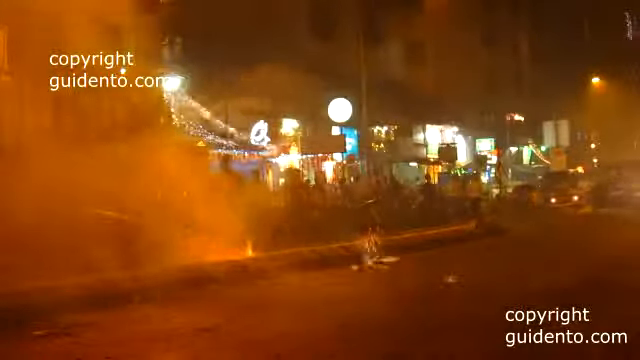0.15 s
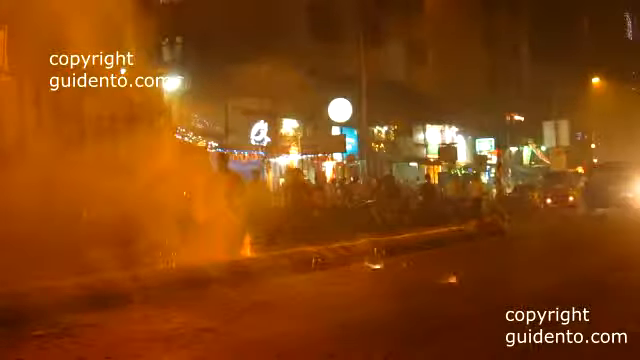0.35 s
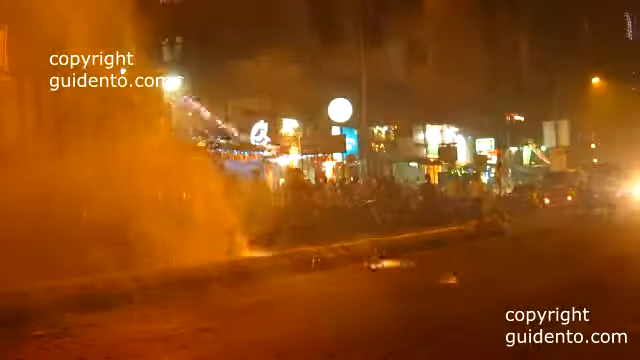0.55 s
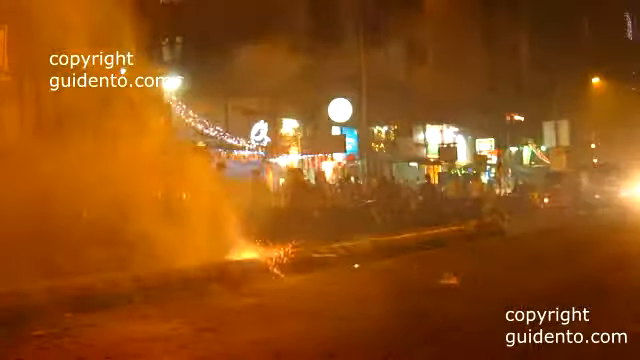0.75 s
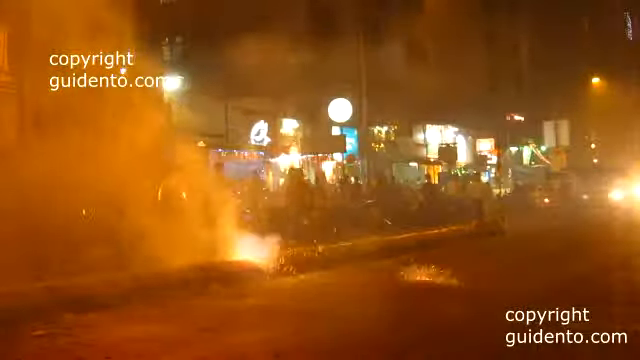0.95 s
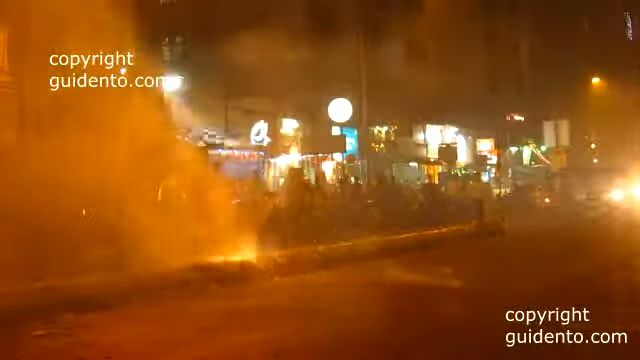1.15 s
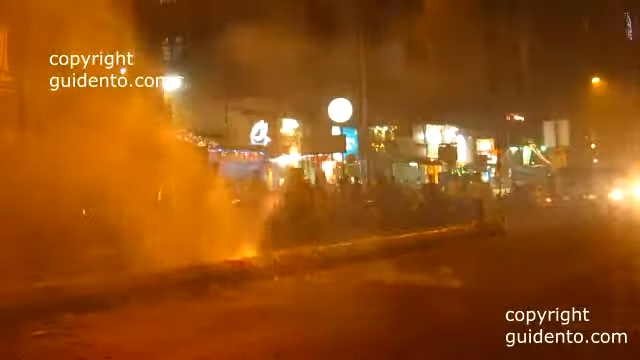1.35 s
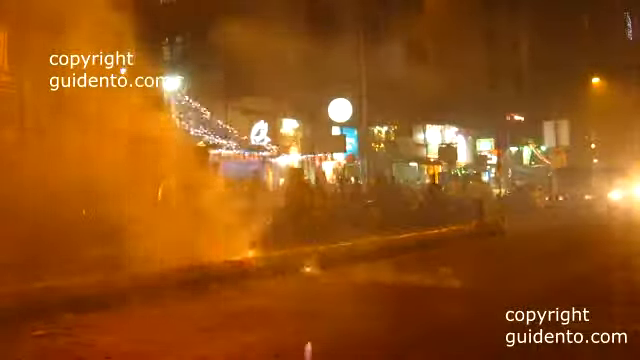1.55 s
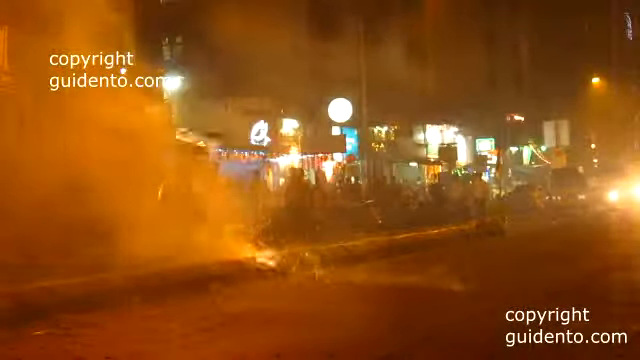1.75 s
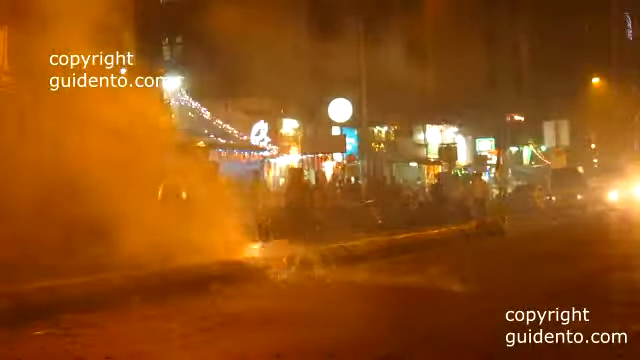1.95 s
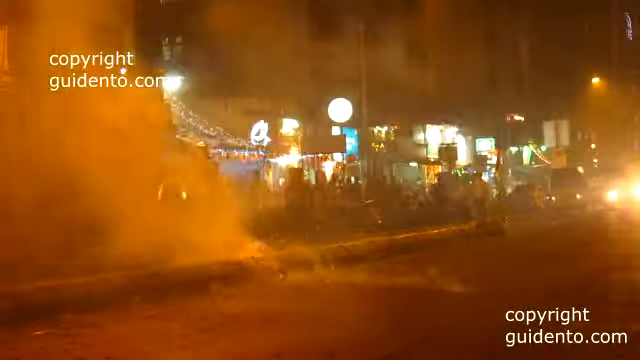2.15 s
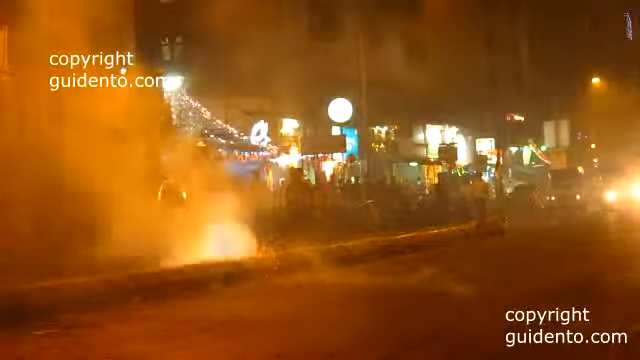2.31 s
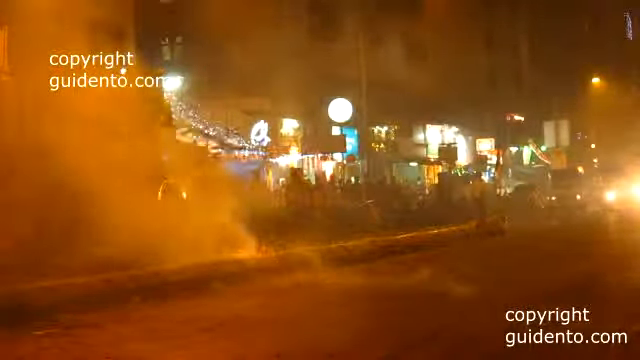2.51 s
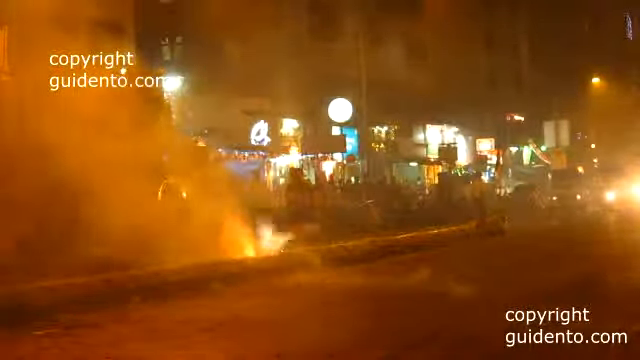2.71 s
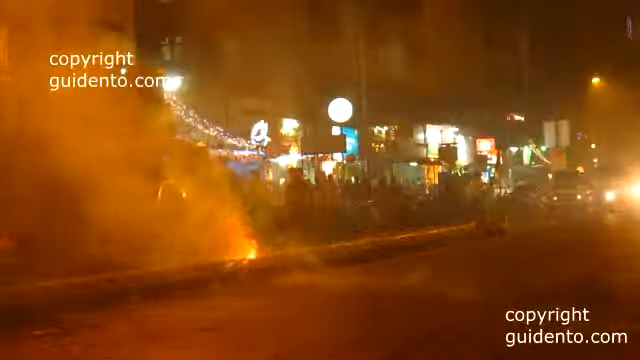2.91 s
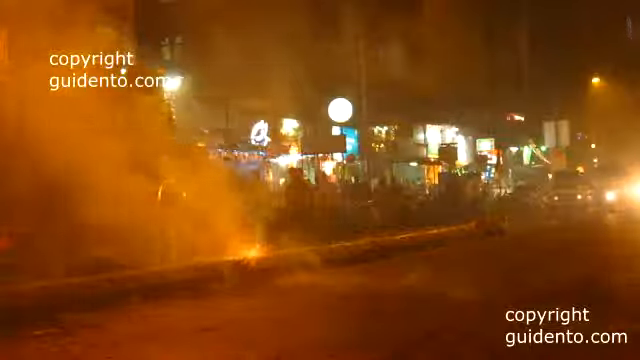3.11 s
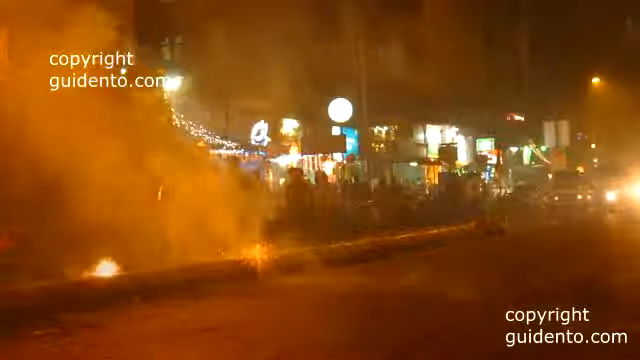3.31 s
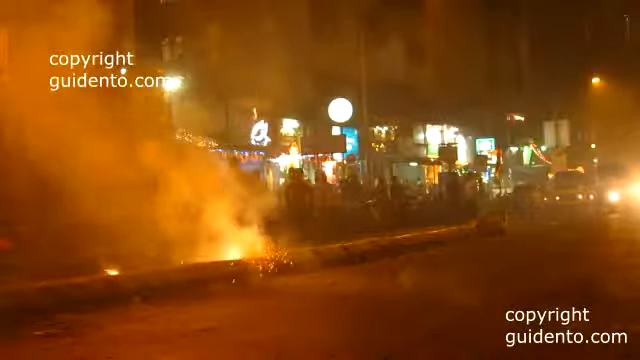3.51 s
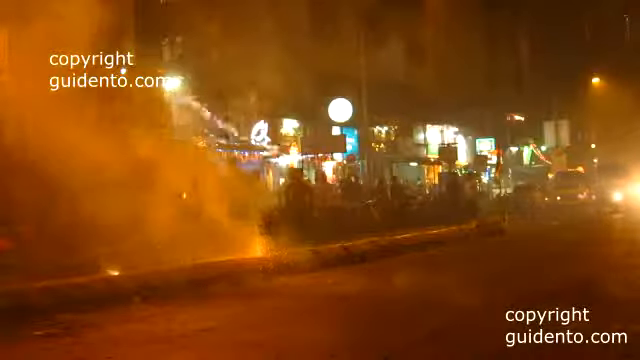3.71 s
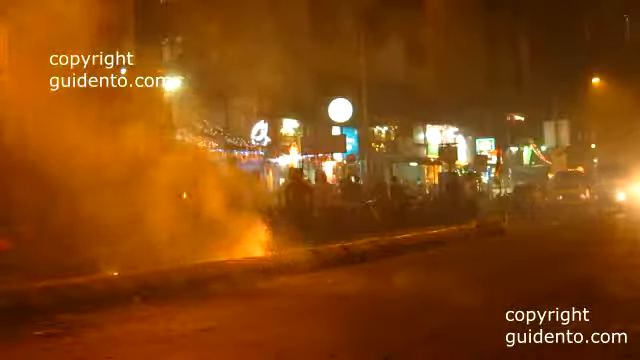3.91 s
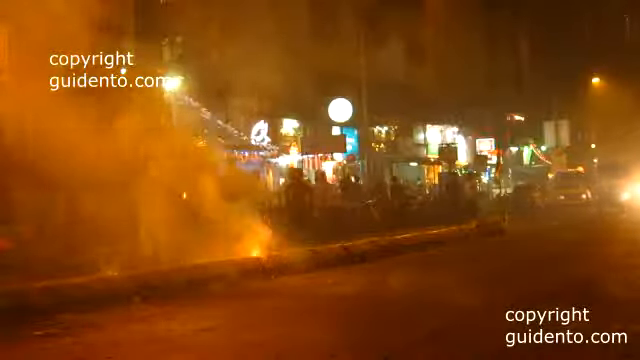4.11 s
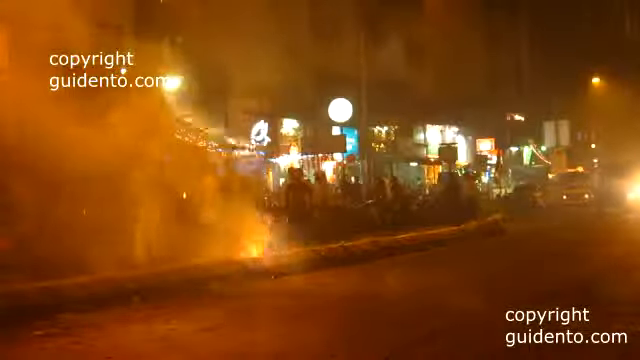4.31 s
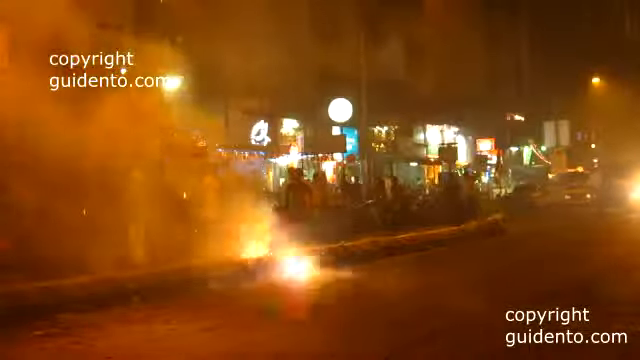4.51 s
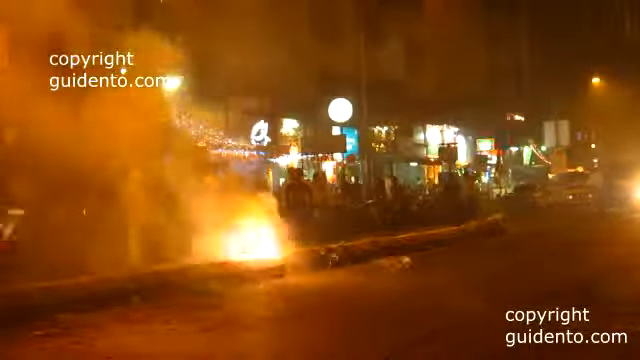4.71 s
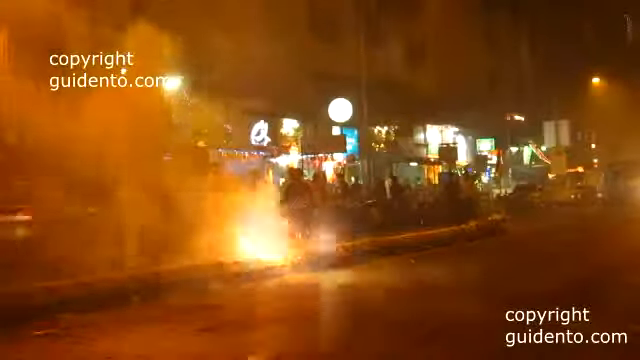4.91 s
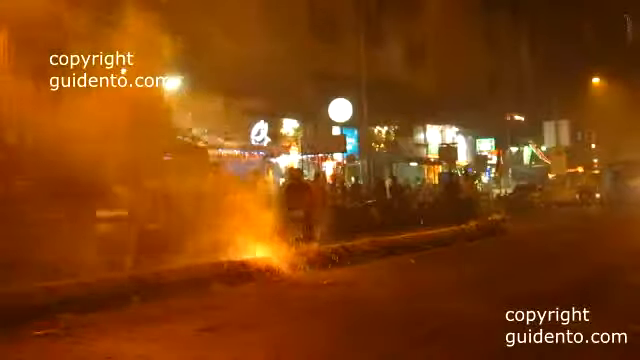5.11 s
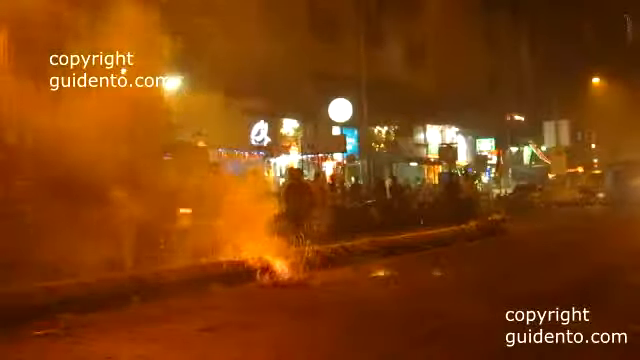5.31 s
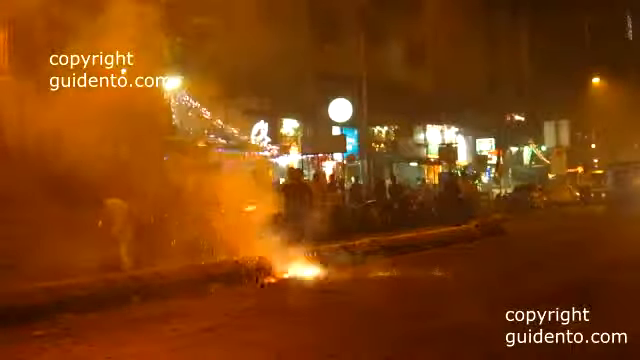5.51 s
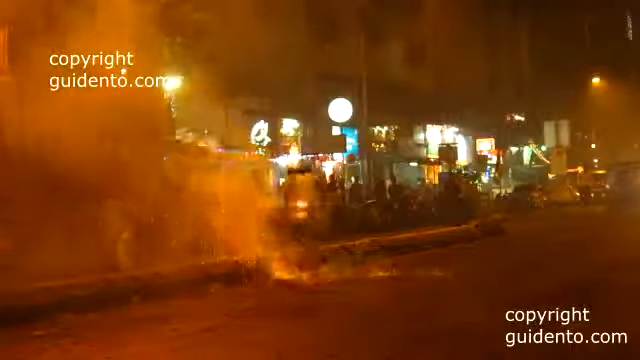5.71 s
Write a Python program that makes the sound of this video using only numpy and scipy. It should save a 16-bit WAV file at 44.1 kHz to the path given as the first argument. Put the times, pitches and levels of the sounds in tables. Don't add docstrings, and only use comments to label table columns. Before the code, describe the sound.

A string of firecrackers goes off in a paved street at night. Short, blunt cracks come irregularly, singly and in tight clusters, each with a quick kerb echo, a slap from house fronts and a tail along the street. Behind them distant crackers blur into a swelling roar. The small microphone overloads, flattening the bangs, and the background dips after the hardest ones. A brief wind rumble comes near the start.

```python
import sys
import numpy as np
from scipy import signal
from scipy.fft import rfft, irfft
from scipy.io import wavfile

SR = 44100
rng = np.random.default_rng(int(sys.argv[2]) if len(sys.argv) > 2 else 0)


def magnitude_from_level(level_db):
    exponent = np.asarray(level_db, float) / 20
    return 10 ** exponent


def wav_record(signal):
    frames = np.transpose(np.atleast_2d(signal))
    bounded = np.clip(frames, -1, 1)
    quanta = np.round(bounded * 32767).astype(np.int16)
    wavfile.write(sys.argv[1], SR, quanta)


N = 253575

# (time [s], level [dB])
FAR_BURN = [(0.0, -52.5), (0.2, -51.5), (0.3, -47), (0.6, -50.5), (0.9, -54), (1.22, -48), (1.63, -51.5),
            (2.02, -46.5), (2.2, -53.5), (2.43, -55.5), (2.64, -45.5), (3.0, -49.5), (3.5, -45),
            (4.2, -49.5), (4.6, -47.5), (4.93, -55), (5.22, -45.5), (5.75, -51.5)]
# (time [s], level [dB])
FAR_VEIL = [
    (0, 3.4),
    (0.6, -2.5),
    (1.0, 2),
    (2.0, 1.1),
    (2.5, -4.5),
    (3.0, 0.1),
    (4.25, 2.5),
    (4.65, -4),
    (5.1, 1),
]
# (time [s], level [dB])
GUST_BLOW = [
    (0.2, -69),
    (0.27, -65.5),
    (0.454, -49.5),
    (0.6, -52.5),
    (0.7, -54),
    (0.808, -47.5),
    (0.83, -58),
]
# (frequency [Hz], level [dB per Hz])
CRACK_TONE = [(30, -51), (60, -46.5), (150, -14), (366, -9.5), (513, 3), (745, 1.5), (1200, -5.5),
              (1570, -11.5), (2670, -14), (3500, -21.5), (4200, -22), (5400, -24.5), (7500, -22.5),
              (10500, -45.5)]
# (frequency [Hz], level [dB per Hz])
ROAR_TONE = [(30, -53), (60, -27), (136, -24.5), (296, -7.5), (504, -5.5), (954, -1.5), (1180, -3),
             (1490, -12.5), (2870, -11.5), (4200, -23), (5400, -24.5), (7000, -26.5), (9000, -22.5),
             (10600, -45.5)]
# (frequency [Hz], level [dB per Hz])
GUST_TONE = [(12, -25), (30, -19.5), (87, -5.5), (150, -4.5), (300, 1.5), (450, -4), (700, -8.5),
             (1500, -44)]
# (time [s], peak [dB], wall slap [dB], street tail [dB])
OPEN_BLASTS = [(0.002, -37, -17, -5.5), (0.813, -34.5, -3.5, -6.5), (1.046, -35, -8, -1),
               (1.116, -39, -14.5, -10), (1.297, -39.5, -3.5, -3.5), (1.567, -38.5, -8, -1.5),
               (1.667, -37, -21, -7), (2.697, -36.5, -5, -2), (2.797, -36, -11, -7), (3.104, -39.5, 1.5, 0),
               (3.127, -43, 3.5, -12), (3.389, -37, -3, 1), (3.48, -36.5, -7, -2.5), (3.908, -37, -3.5, -5),
               (4.158, -39, -10, -4), (4.904, -37, -7, -3), (5.04, -32, -4, 0), (5.062, -42.5, 3, -8),
               (5.09, -48, 5.5, -20), (5.114, -39.5, -9.5, -9), (5.3483, -37, -4, -5),
               (5.582, -48.5, 6, -6), (5.628, -40.5, -22, -1.5)]
# (time [s], peak [dB], wall slap [dB], street tail [dB], duck [dB])
HARD_BLASTS = [
    (0.941, -39, -17, -6, 3),
    (0.986, -39, -17, 3, 4),
    (1.787, -36.5, 0, -7.5, 2.5),
    (1.985, -40, -6, -8.5, 4.5),
    (3.313, -39.5, -11, 6, 7),
    (3.353, -36, -5, -7.5, -1.5),
    (3.608, -40.5, 2, 1, 2),
    (4.6175, -38, -19, -15.5, 2.5),
    (5.013, -38, -3, 4, 7.5),
    (5.609, -40.5, -15, -5, 3),
]
# (time [s], peak [dB], wall slap [dB], street tail [dB])
HIDDEN_BLASTS = [
    (1.406, -36, -10, -5.5),
    (2.385, -35, -3.5, -1.5),
    (2.542, -47.5, 1, -1),
    (3.273, -39, -22, -2),
    (4.103, -37.5, -14, -14),
    (4.432, -38.5, 2.5, -5.5),
]
# (time [s], peak [dB], duck [dB])
LONE_BLASTS = [
    (0.043, -49, 2.5),
    (2.1756, -37.5, 2.5),
    (3.24, -50, 3.5),
    (3.555, -49, 2),
    (3.736, -40, 1),
    (3.8, -42, -0.3),
    (4.232, -59, 0.5),
    (4.633, -43, -0.7),
    (4.793, -41, -5.1),
    (4.8235, -36, 7),
]
# (time [s], level [dB])
AIR_PUFFS = [(0.816, -52), (0.943, -62), (1.115, -55), (1.407, -63), (1.572, -61), (2.698, -56),
             (3.074, -59), (3.096, -53), (3.116, -56), (3.909, -57), (4.098, -64), (4.161, -55),
             (4.433, -53), (4.618, -58), (5.094, -50)]

OPEN_CRACK_MS, HARD_CRACK_MS, HIDDEN_CRACK_MS = 13.3, 9.9, 10.8
OPEN_BRIGHT_DB, HARD_BRIGHT_DB, HIDDEN_BRIGHT_DB = 10, 8, -3.5
OPEN_THUMP_DB, HARD_THUMP_DB, HIDDEN_THUMP_DB = -23.5, -34, -36
HIDDEN_DUCK_DB = 1.5
SHOCK_DB, SNAP_DB, SNAP_HZ = 16, -15, 3000
FADE_DB, FADE_S = 8, .004
KERB_ECHO_S, KERB_ECHO_DB = .0048, -5
SLAP_START_S, SLAP_END_S, TAIL_T60_S = .024, .053, 0.57
HIGHS_DB, HIGHS_FOLLOW, REFERENCE_BURN_DB = -56.5, 0.91, -46
RUMBLE_DB, HUM_HZ, HUM_DB, HISS_DB = -65.5, 141.5, -75.5, -104
REACT_S, RECOVER_S = .0085, 0.2
OVERLOAD, HARDNESS, OFFSET = .0140, 7, -.0002


def rms_one(x):
    return x / np.sqrt(np.mean(x ** 2) + 1e-20)


def above(x, hz):
    return signal.sosfilt(signal.butter(2, hz, "high", fs=SR, output="sos"), x)


def colour(x, spectrum):
    size = 16384
    hz, level_db = np.transpose(spectrum)
    grid = np.maximum(np.arange(size // 2 + 1) * SR / size, 1)
    cepstrum = irfft(np.log(magnitude_from_level(np.interp(np.log(grid), np.log(hz), level_db))))
    cepstrum[1:size // 2] *= 2
    cepstrum[size // 2 + 1:] = 0
    fade_out = np.hanning(size // 2)[size // 4:]
    response = irfft(np.exp(rfft(cepstrum)))[:size // 4] * fade_out
    return signal.fftconvolve(x, response / np.sqrt(np.sum(response ** 2)))[:N]


def drift(rate):
    r = np.exp(-2 * np.pi * rate / SR)
    wander = signal.lfilter([1], [1, -2 * r, r * r], rng.standard_normal(N + SR))
    return rms_one(wander[SR:])


def scatter(per_s, spread_db):
    sizes = magnitude_from_level(spread_db * np.minimum(rng.exponential(1, N), 2.6))
    signs = rng.choice([-1, 1], N)
    return rms_one(sizes * signs * (rng.random(N) < per_s / SR))


def engine_drone():
    hz = HUM_HZ + 6.2 * drift(3.8)
    return magnitude_from_level(HUM_DB) * np.sin(2 * np.pi * np.cumsum(hz) / SR)


def gust(time):
    blow = magnitude_from_level(np.interp(time, *np.transpose(GUST_BLOW), left=-90, right=-90)) + magnitude_from_level(RUMBLE_DB)
    lumps = magnitude_from_level(0.29 * drift(35))
    return colour(rng.standard_normal(N) * blow * lumps, GUST_TONE)


def far_roar(time):
    roar_db = np.interp(time, *np.transpose(FAR_BURN))
    veil_db = np.interp(time, *np.transpose(FAR_VEIL))
    highs_db = HIGHS_DB + HIGHS_FOLLOW * (roar_db - REFERENCE_BURN_DB) + veil_db
    swell_db = 0.41 * np.tanh(drift(20)) + 0.79 * np.tanh(drift(90))
    roar = colour(scatter(2500, 0.84) * magnitude_from_level(swell_db), ROAR_TONE)
    return magnitude_from_level(roar_db) * roar + (magnitude_from_level(highs_db + 10.0) - magnitude_from_level(roar_db)) * above(roar, 1000)


def all_blasts():
    in_open = [(*row, 0, OPEN_CRACK_MS, OPEN_BRIGHT_DB, OPEN_THUMP_DB) for row in OPEN_BLASTS]
    hard = [(*row, HARD_CRACK_MS, HARD_BRIGHT_DB, HARD_THUMP_DB) for row in HARD_BLASTS]
    hidden = [(*row, HIDDEN_DUCK_DB, HIDDEN_CRACK_MS, HIDDEN_BRIGHT_DB, HIDDEN_THUMP_DB)
              for row in HIDDEN_BLASTS]
    return in_open + hard + hidden


def gain_control():
    ducks = np.zeros(N)
    events = [(row[0], row[4]) for row in all_blasts()]
    events += [(s, duck_db) for s, peak_db, duck_db in LONE_BLASTS]
    for s, depth_db in events:
        ducks[round((s + REACT_S) * SR)] = depth_db
    return magnitude_from_level(-signal.lfilter([1], [1, -np.exp(-1 / (RECOVER_S * SR))], ducks))


def thumps():
    steps = np.zeros(N)
    pushes = [(row[0] + 0.00067, row[1] + row[-1]) for row in all_blasts()]
    for s, level_db in pushes + AIR_PUFFS:
        steps[round(s * SR)] = magnitude_from_level(level_db + 46)
    return -signal.sosfilt(signal.butter(1, [35, 110], "band", fs=SR, output="sos"), steps)


def shock_fronts():
    shocks = np.zeros(N + SR)
    for s, peak_db, *rest in OPEN_BLASTS + HARD_BLASTS + HIDDEN_BLASTS + LONE_BLASTS:
        shocks[round(s * SR)] = magnitude_from_level(peak_db + SHOCK_DB)
        shocks[round((s + KERB_ECHO_S) * SR)] = magnitude_from_level(peak_db + SHOCK_DB + KERB_ECHO_DB)
    return shocks[:N]


def blasts():
    age = np.arange(SR) / SR
    near, street, sharp_db = np.zeros((3, N + SR))
    slap_phase = np.clip((age - SLAP_START_S) / (SLAP_END_S - SLAP_START_S), 0, 1)
    slap = np.sin(np.pi * slap_phase ** .7) ** .9
    tail = magnitude_from_level(-120 * age / TAIL_T60_S) + 0.14 * magnitude_from_level(-120 * age / 1.2)
    for s, peak_db, slap_db, tail_db, duck_db, crack_ms, bright_db, thump_db in sorted(all_blasts()):
        at = round(s * SR)
        crack = 1 / (1 + (age * 1000 / crack_ms) ** 12)
        near[at:at + SR] += magnitude_from_level(2 * peak_db - 6) * (crack + magnitude_from_level(2 * slap_db) * slap)
        street[at:at + SR] += magnitude_from_level(2 * (peak_db + tail_db) - 4.5) * tail
        sharp_db[at:at + SR] = bright_db - FADE_DB * (1 - np.exp(-age / FADE_S))
    shocks = shock_fronts()
    cracks = colour(np.sqrt(near[:N]) * scatter(9000, 3.55) + shocks, CRACK_TONE)
    cracks = cracks + magnitude_from_level(SNAP_DB) * above(shocks, SNAP_HZ)
    cracks = cracks + (magnitude_from_level(sharp_db[:N]) - 1) * above(cracks, 930)
    tails = colour(np.sqrt(street[:N]) * scatter(5000, 2.44), ROAR_TONE)
    return cracks, tails


def scene():
    time = np.arange(N) / SR
    cracks, tails = blasts()
    ducked = gain_control() * (tails + far_roar(time) + gust(time))
    return (engine_drone() + ducked + thumps() + cracks)[None]


def roll_off(x):
    return signal.sosfilt(signal.butter(12, 10800, fs=SR, output="sos"), x)


def record(dry):
    flat = dry / (1 + np.abs(dry / OVERLOAD) ** HARDNESS) ** (1 / HARDNESS)
    dull = signal.sosfilt(signal.butter(3, 3700, fs=SR, output="sos"), flat)
    dull = dull + magnitude_from_level(-24.5) * flat
    hiss = magnitude_from_level(HISS_DB) * rng.standard_normal(dry.shape)
    mix = above(dull, 12) + OFFSET + hiss
    return roll_off(mix)


dry = scene()
out = record(dry)
wav_record(out)
```